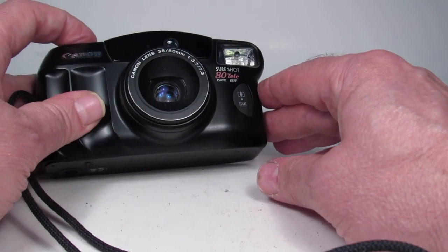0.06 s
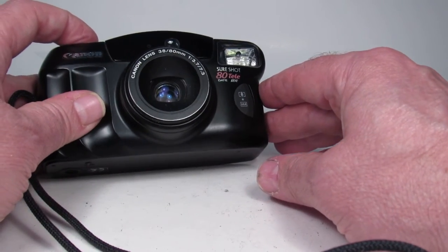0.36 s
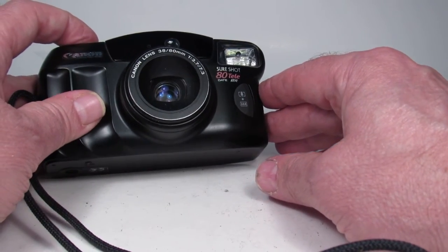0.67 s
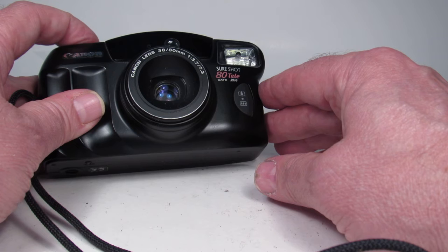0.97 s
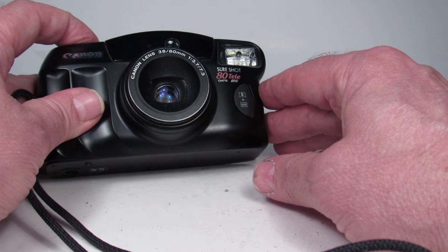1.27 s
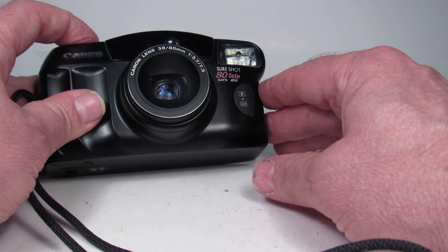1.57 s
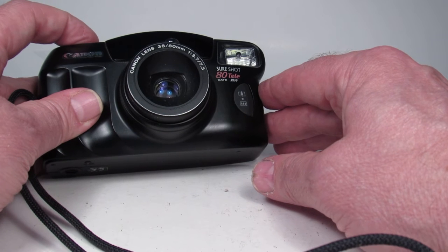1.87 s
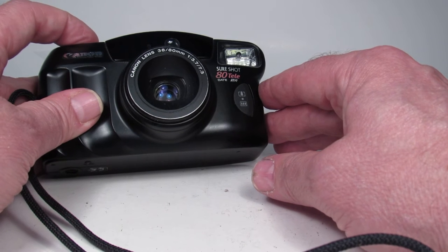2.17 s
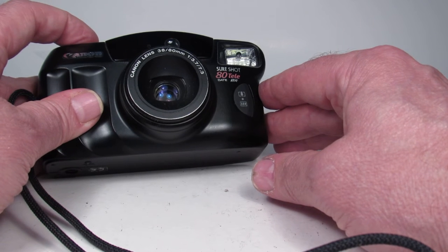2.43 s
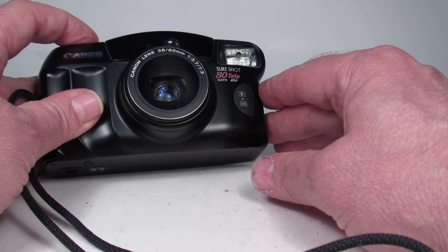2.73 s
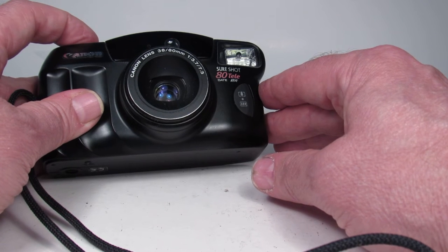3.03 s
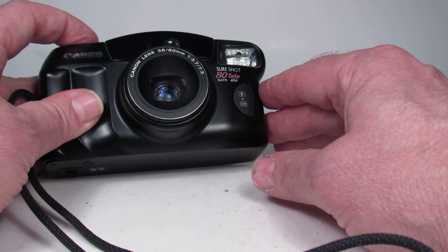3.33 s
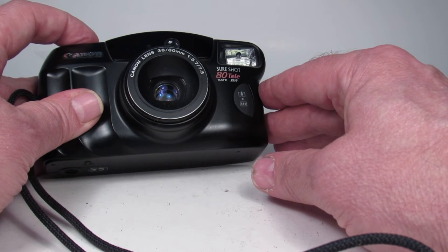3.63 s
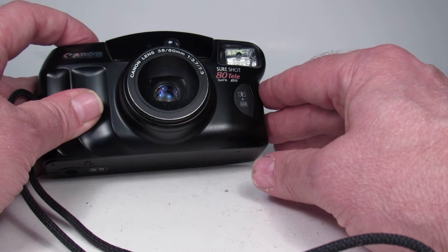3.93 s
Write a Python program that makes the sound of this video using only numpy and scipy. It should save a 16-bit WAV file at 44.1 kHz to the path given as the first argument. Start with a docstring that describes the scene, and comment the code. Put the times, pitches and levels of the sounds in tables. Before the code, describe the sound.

A compact film camera's zoom motor whirs briefly and stops. A click follows, then two thinner whirs with a sharp shutter snap between them, and a longer zoom whir. It is close up in a small, humming room.

```python
"""A compact film camera, worked by hand on a table close to the microphone, in a small room.
Its zoom motor runs and stops; the release clicks, a lighter drive whirs, the shutter snaps, the drive
whirs again and the zoom spins up for a long run. Gear teeth whine and rasp in the plastic body.
Behind it, a little to the right, sits a steady mains hum over low rumble and faint air."""
import sys
import numpy as np
from scipy import signal
from scipy.fft import rfft, irfft
from scipy.io import wavfile

SR = 44100
rng = np.random.default_rng(int(sys.argv[2]) if len(sys.argv) > 2 else 0)


def wrap_up_sound(samples):
    """Save the sound to the file named by the first command line argument, as 16-bit audio."""
    columns = np.atleast_2d(samples).T
    # keep every value between -1 and 1, then stretch to whole-number steps
    tamed = np.clip(columns, -1, 1)
    steps = np.round(tamed * 32767).astype(np.int16)
    wavfile.write(sys.argv[1], SR, steps)


N = 176400
T = np.arange(N) / SR


# Each row: switch-on and switch-off in seconds, gear level in dB, rotor hum in dB.
ZOOM_SWITCHING = [(-.3, 0.293, -2.43, -66), (2.234, 3.382, -1.5, -48.5)]
# Each row: time in seconds, shaft speed once spun up in turns per second.
ZOOM_SHAFT_SPEED = [(0, 132.3), (.106, 130.3), (.196, 131.5), (.3, 130.1), (2.43, 130.3), (2.47, 129.3),
                    (2.55, 130.2), (2.638, 129.2), (2.7, 130.1), (2.82, 129.6), (2.87, 130.1),
                    (2.92, 129.4), (2.97, 130.1), (3.1, 129.2), (3.25, 129), (3.316, 128), (3.39, 128.7)]
# Each row: multiple of shaft speed, relative level in dB, exponent of its growth with speed.
ZOOM_GEAR_TONES = [(7, -58.5, 6.3), (8, -59, 4.5), (10, -60.5, 7), (11, -44, 13), (12, -48.5, 7),
                   (17, -59.5, 8.3), (21, -54.5, 9.8), (25, -50, 13), (26, -57, 11), (29, -53, 12),
                   (33, -53, 17), (44, -55.5, 17), (53, -56.5, 17), (55, -55, 17), (66, -60, 18)]
# Each row: frequency in Hz, relative level of the rasp in dB.
ZOOM_RASP_SPECTRUM = [(200, -20), (450, 1.5), (680, -21), (900, 1.5), (1200, -2), (1480, 11), (1800, 3.5),
                      (2200, 7), (2480, 1), (2800, 2.5), (3300, 8), (4000, -0.5), (4600, 5.5), (5200, 0),
                      (5700, 5.5), (6300, 2.5), (7000, 7), (7600, -1.5), (8600, -1.5), (10000, -5.5),
                      (12500, -9.5), (15000, -10.5)]
def zoom_motor(pinion_order=22, pinion_db=-47, strain_db=8.5, rasp_db=-40.5):
    """The zoom motor spins up, holds its speed under load and brakes; its three-pole rotor hums."""
    share, brake, level, hum = np.ones(N), np.ones(N), np.zeros(N), np.zeros(N)
    for on, off, db, hum_db in ZOOM_SWITCHING:
        speed, loud, slowing = motor_run(on, off, rise_s=.031, stop_s=.021)
        share = np.where(T > on, speed, share)
        brake = np.where(T > on, slowing, brake)
        level += amp(db) * loud
        hum += amp(hum_db) * loud
    full_speed = np.interp(T, *np.transpose(ZOOM_SHAFT_SPEED))
    turns = np.cumsum(full_speed * share * brake * (1 + .001196 * wander(30))) / SR
    rotor = hum * (share * brake) ** 30 * np.sqrt(2) * np.cos(2 * np.pi * 3 * turns)
    strain = 27 / 4 * share ** 2 * (1 - share)  # peaks at 1 while the motor accelerates
    pinion = gear_whine(turns, share, [(pinion_order, pinion_db, 0)], .42, flutter_hz=35, swell_db=.5)
    pinion *= share * brake ** 8 * amp(strain_db * strain)
    whine = brake ** 3 * gear_whine(turns, share, ZOOM_GEAR_TONES, flutter=.34, flutter_hz=30)
    rasp = gear_rasp(turns, ZOOM_RASP_SPECTRUM, repeat=.3, throb=.026, grit_db=.5)
    return rotor + level * (pinion + whine + amp(rasp_db) * rasp)


# Each row: switch-on and switch-off in seconds, level in dB, whine trim in dB.
DRIVE_SWITCHING = [(1.408, 1.743, -2.04, -2.7), (1.844, 2.172, -0.4, -13)]
# Each entry: full shaft speed of one run in turns per second.
DRIVE_SHAFT_SPEEDS = [130.4, 141]
# Each row: multiple of shaft speed (played rounded), relative level in dB, exponent of growth with speed.
DRIVE_GEAR_TONES = [(11, -53, 4.8), (16.2, -63, 2.7), (22, -63, 0.62)]
# Each row: frequency in Hz, relative level of the rasp in dB.
DRIVE_RASP_SPECTRUM = [(300, -22), (700, -9), (1150, -11), (1450, -2), (1800, -8), (2300, -6), (2900, -8.5),
                       (4000, -6.5), (4800, -9), (5300, -1.5), (5580, 9.5), (5950, -5.5), (6400, -6),
                       (6900, -5), (8000, -0.5), (9400, -3.5), (10200, -3), (11200, -7), (12000, -7.5),
                       (15000, -7)]
# Each row: housing resonance in Hz, width in Hz, relative level in dB.
HOUSING_MODES = [(1450, 37, -72), (2286, 37, -63.5), (4060, 38, -72), (5550, 96, -66), (6280, 74, -57.5),
                 (8350, 120, -65), (9350, 160, -59.5), (11220, 350, -60.5)]
# The housing sings as a gear tone passes its resonance.
# In order: multiple of shaft speed, resonance in Hz, width in Hz, level going in, in dB.
HOUSING_SING = (44, 5660, 435, -51)
def light_drive(rasp_db=-46.5):
    """A thin, hissing gear train runs before and after the shutter and rings its housing."""
    out = np.zeros(N)
    order, sing_hz, sing_width, sing_db = HOUSING_SING
    for (on, off, db, whine_db), full_speed in zip(DRIVE_SWITCHING, DRIVE_SHAFT_SPEEDS):
        share, level, brake = motor_run(on, off, rise_s=.034, stop_s=.015)
        turns = np.cumsum(full_speed * share * brake * (1 + .00326 * wander(24.6))) / SR
        rasp = gear_rasp(turns, DRIVE_RASP_SPECTRUM, repeat=.39, throb=.09, grit_db=-1)
        housing = sum(amp(mode_db) * unit(ring(rasp, hz, width)) for hz, width, mode_db in HOUSING_MODES)
        mesh = gear_whine(turns, share, [(order, sing_db, 0)], flutter=.9, flutter_hz=90, swell_db=4)
        sing = ring(ring(mesh, sing_hz, sing_width), sing_hz, sing_width)
        whine = gear_whine(turns, share, DRIVE_GEAR_TONES, flutter=.36, flutter_hz=40.7)
        out += amp(db) * level * (amp(whine_db) * whine + amp(rasp_db) * rasp + housing + sing)
    return out


def motor_run(on, off, rise_s, stop_s, spin_s=.04, brake_s=.06):
    """A switched motor: its share of full speed on spin-up, its loudness and its braking factor."""
    age, after = np.maximum(T - on, 0), np.maximum(T - off, 0)
    loudness = (1 - np.exp(-age / rise_s)) ** 2 / (1 + (after / stop_s) ** 3)
    return 1 - np.exp(-age / spin_s), loudness, np.exp(-after / brake_s)


def gear_whine(turns, share, tones, flutter, flutter_hz, swell_db=1.83):
    """Mesh tones locked to the shaft, each swelling slowly and fluttering as the teeth seat unevenly."""
    out = np.zeros(N)
    for order, db, growth in tones:
        level = amp(db + swell_db * wander(5.5)) * share ** abs(growth) * np.sqrt(2)
        out += level * (waver(flutter, flutter_hz) * np.exp(2j * np.pi * round(order) * turns)).real
    return out


def gear_rasp(turns, spectrum, repeat, throb, grit_db):
    """Tooth impacts: a pattern repeating every two shaft turns plus loose chatter, throbbing each turn."""
    teeth = signal.resample(rng.standard_normal(640), 8192)
    worn = np.interp(turns / 2 % 1, np.arange(8192) / 8192, teeth)
    loose = rng.standard_normal(N) * (rng.random(N) < .15)
    loose *= amp(grit_db * np.minimum(rng.exponential(1, N), 4))
    impacts = np.sqrt(repeat) * unit(worn) + np.sqrt(1 - repeat) * unit(loose)
    pulsing = 1 + throb * np.cos(2 * np.pi * turns) + .18 * wander(38)
    return unit(shape(impacts * pulsing, spectrum))


# Each row: start in seconds, level in dB, decay in seconds.
MECHANISM_HITS = [(1.0253, -58.5, .0031), (1.2379, -35.5, 0.0077), (1.2426, -40, 0.0019),
                  (1.815, -37, 0.0046), (1.8235, -30.5, 0.0016), (1.8316, -23, 0.0036), (3.63, -59, 0.0057),
                  (3.95, -51, 0.0019)]
# Each row: frequency in Hz, relative response of the shell in dB.
SHELL_SPECTRUM = [(200, -18), (450, -10), (690, -16), (850, -4.5), (1500, -5.5), (2800, -9.5), (3500, -2.5),
                  (4700, -5.5), (5600, -0.5), (6400, 1), (7200, -7), (8700, -.5), (10400, -6.5),
                  (11800, -7), (15000, -20)]
def clicks(ring_db=-21, ring_s=.042, ring_top_hz=8000, tick_db=-2, tick_s=.00015):
    """Latch and shutter parts hit their stops: a bright tick, a dense crack, a duller ring of the shell."""
    crack, tail = np.zeros(N), np.zeros(N)
    for start, db, decay_s in MECHANISM_HITS:
        age, level = np.maximum(T - start, 0), amp(db) * (T >= start)
        crack += level * (np.exp(-age / decay_s) + amp(tick_db) * np.exp(-age / tick_s))
        tail += level * amp(ring_db) * np.exp(-age / ring_s)
    crack_noise, tail_noise = rng.choice([-1., 1.], (2, N))
    dull_ring = signal.lfilter(*signal.butter(2, ring_top_hz, fs=SR), tail * tail_noise)
    return shape(crack * crack_noise + dull_ring, SHELL_SPECTRUM)


# Each row: start in seconds, level in dB, pitch in Hz, decay in seconds.
FINGER_BUMPS = [(1.308, -35, 446, 0.0048), (1.411, -48, 384, .013), (1.615, -33, 177, 0.046)]
def finger_knocks():
    """Fingers bump the camera body: dull, quickly damped knocks."""
    out = np.zeros(N)
    for start, db, hz, decay_s in FINGER_BUMPS:
        age = np.maximum(T - start, 0)
        out += amp(db) * np.sin(2 * np.pi * hz * age) * np.exp(-age / decay_s)
    return out


# Each row: frequency in Hz, side level relative to mid in dB.
STEREO_WIDTH = [(400, -2.5), (1400, -9.5), (2800, -95), (5000, -13), (9000, -9), (14000, -5.5)]
# Each row: frequency in Hz, seconds for the room to fall by 60 dB.
ROOM_DECAY = [(300, 0.96), (2500, 0.3), (6000, 0.78), (14000, 0.51)]
def reflections(x, room_db=-18, early_s=.007):
    """Close bounces off table and hands widen the camera; the small room adds a faint tail."""
    early = rng.standard_normal(2048) * np.exp(-T[:2048] / early_s)
    bounced = np.convolve(x, early / np.linalg.norm(early))[:N]
    side = irfft(rfft(bounced) * amp(read(STEREO_WIDTH, np.fft.rfftfreq(N, 1 / SR))), N)
    hz, t, noise = signal.stft(rng.standard_normal((2, SR // 2)), SR, nperseg=256)
    tail = signal.istft(noise * amp(-60 * t / read(ROOM_DECAY, hz)[:, None]), SR, nperseg=256)[1]
    wet = signal.fftconvolve(x[None], tail / np.linalg.norm(tail[0]), axes=1)[:, :N]
    return np.array([x + side, x - side]) + amp(room_db) * wet


# Each row: frequency in Hz, relative level in dB, waver depth as a fraction, waver rate in Hz.
HUM_TONES = [(94.7, -41, .25, 4), (120, -24.6, .03, 5), (145.5, -40, .15, 4), (204.6, -45.5, .35, 8),
             (213, -53, .8, 10), (265, -55, .35, 5), (409, -60, .3, 4)]
def mains_hum():
    """Steady mains hum behind the camera, with wavering side tones."""
    out = np.zeros(N)
    for hz, db, depth, rate_hz in HUM_TONES:
        tone = waver(depth, rate_hz) * np.exp(2j * np.pi * (hz * T + rng.random()))
        out += amp(db) * np.sqrt(2) * tone.real
    return out


# Each row, for rumble and for air: frequency in Hz, relative level in dB.
RUMBLE_SPECTRUM = [(20, -2), (35, -44), (55, -7.5), (80, -3.5), (120, -1.5), (175, -4), (235, -10.5),
                   (320, -7), (500, -33.5), (900, -77.5)]
AIR_SPECTRUM = [(200, 1.5), (330, 11), (450, 7), (590, 5), (690, -13.5), (800, 1.5), (1300, -2.5),
                (2000, -11), (3000, -17), (5000, -23), (10000, -19.5), (15000, -26)]
# Each row: frequency in Hz, likeness of left and right from 0 to 1.
ROOM_COHERENCE = [(100, 0.46), (350, 0), (700, 0), (1500, 0.2), (5000, .6), (14000, 0)]
def room_tone(spectrum):
    """Steady room noise, only partly alike on the two sides of the microphone."""
    same = read(ROOM_COHERENCE, np.fft.rfftfreq(N, 1 / SR))
    left, other = rfft(rng.standard_normal((2, N)))
    right = same * left + np.sqrt(1 - same ** 2) * other
    return np.array([shape(irfft(channel, N), spectrum) for channel in (left, right)])


def amp(db):
    """Decibels to gain."""
    return 10 ** (np.asarray(db) / 20)


def pan(left_db):
    """Opposite gains for left and right; negative leans right."""
    return amp([[left_db], [-left_db]])


def unit(x):
    """Scales to rms 1."""
    return x / np.sqrt(np.mean(x ** 2) + 1e-20)


def read(points, hz):
    """Reads a table on a log-frequency axis."""
    f, value = np.transpose(points)
    return np.interp(np.log(hz + 1), np.log(f + 1), value)


def shape(x, spectrum):
    """Minimum-phase filter with the given spectrum and unit power gain."""
    gain = unit(amp(read(spectrum, abs(np.fft.fftfreq(4096, 1 / SR)))))
    taps = np.fft.ifft(np.exp(np.conj(signal.hilbert(np.log(gain))))).real
    return signal.oaconvolve(x, taps[:2048])[:N]


def ring(x, hz, width):
    """One resonance of peak gain 1."""
    return signal.lfilter(*signal.iirpeak(hz, hz / width, SR), x)


def wander(rate_hz):
    """Slow random drift of rms 1."""
    f = np.fft.rfftfreq(2048, 1 / 500)
    slow = irfft(rfft(rng.standard_normal(2048)) / (1 + (f / rate_hz) ** 4))
    return np.interp(T, np.arange(2048) / 500, unit(slow))


def waver(depth, rate_hz):
    """Complex gain that unsteadies a tone's level and phase."""
    return 1 + depth * (wander(rate_hz) + 1j * wander(rate_hz))


def scene(hum_db=-3.5, rumble_db=-46.5, air_db=-51.5):
    """The camera close up and near centre, the humming room behind it."""
    camera = reflections(zoom_motor() + light_drive() + clicks() + finger_knocks())
    drone = amp(hum_db) * mains_hum() + amp(rumble_db) * room_tone(RUMBLE_SPECTRUM)
    air = amp(air_db) * room_tone(AIR_SPECTRUM)
    return camera * pan(-.47) + drone * pan(-3.5) + air * pan(-.8)


def record(dry, cutoff_hz=15080):
    """The recorder's band limit."""
    lowpass = signal.firwin(511, cutoff_hz, window=("kaiser", 9), fs=SR)
    return signal.oaconvolve(dry, lowpass[None], "same")


dry = scene()
out = record(dry)
wrap_up_sound(out)
```